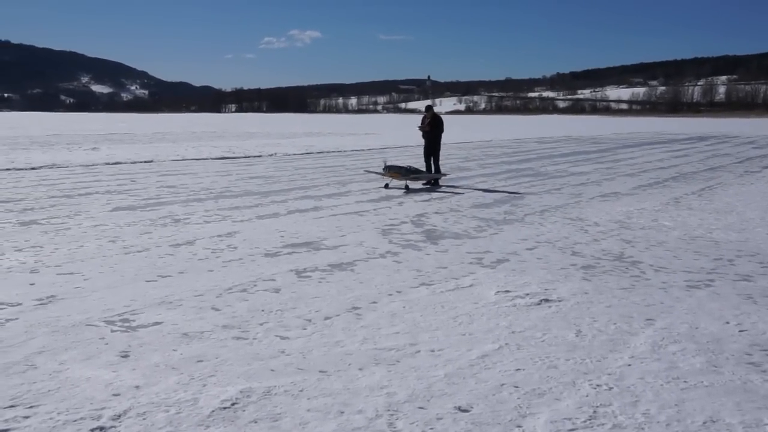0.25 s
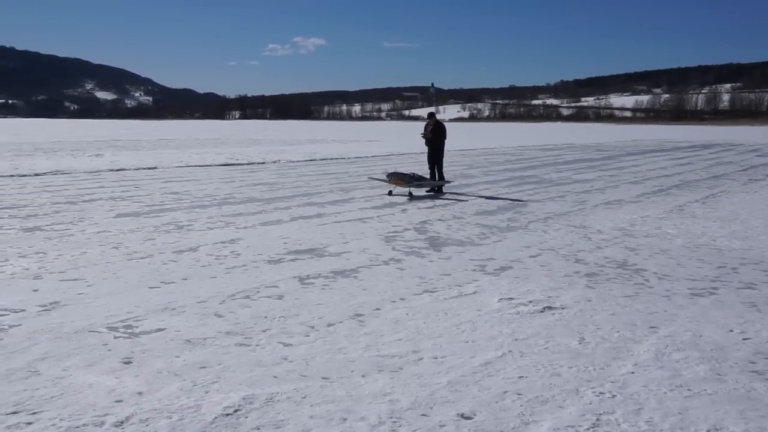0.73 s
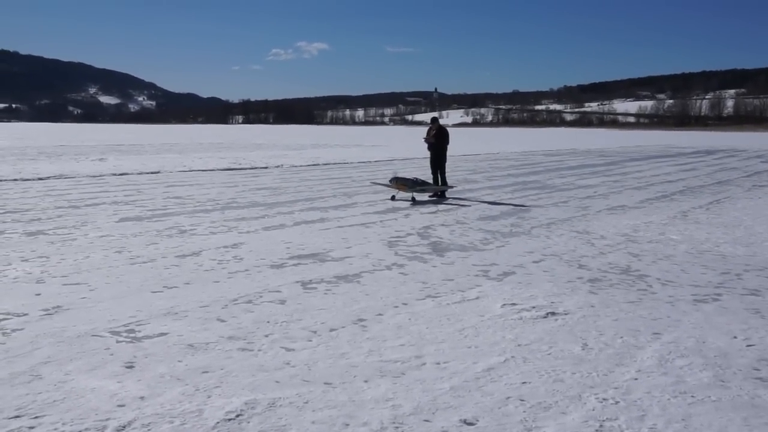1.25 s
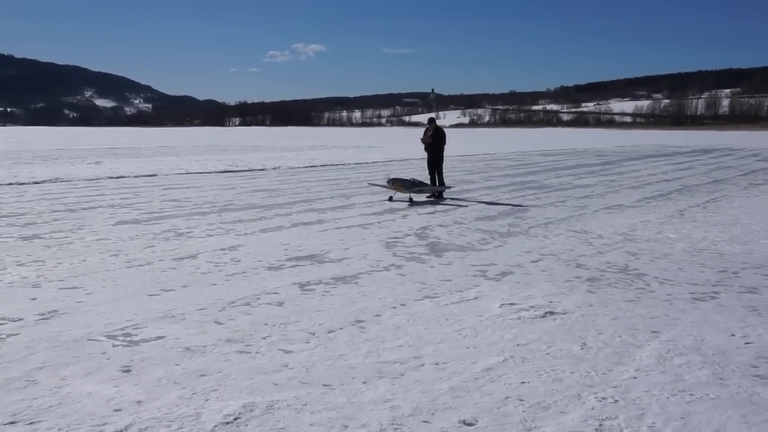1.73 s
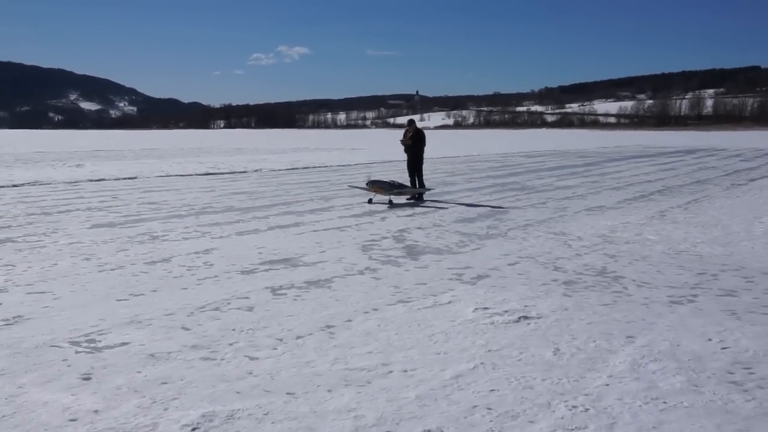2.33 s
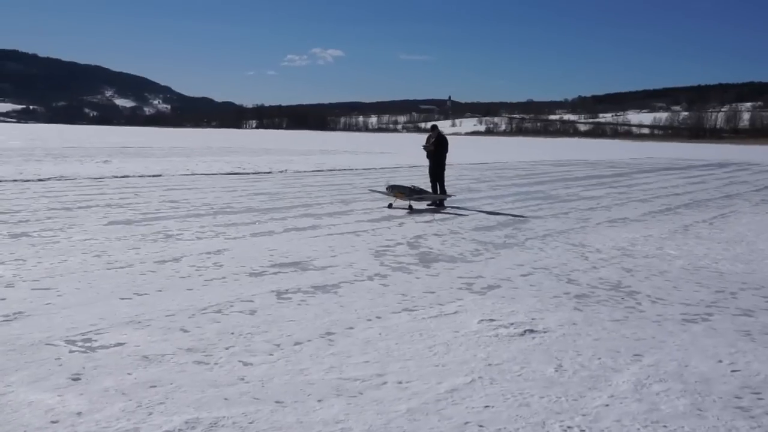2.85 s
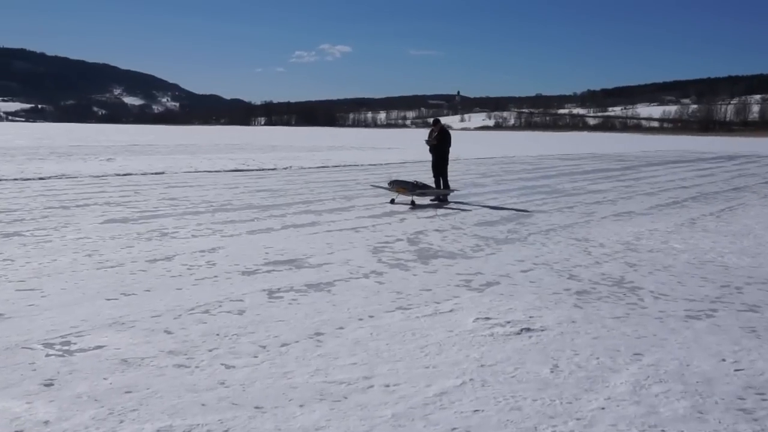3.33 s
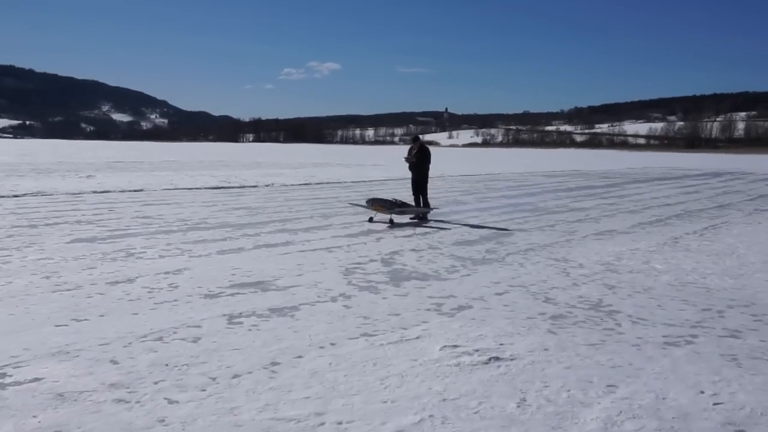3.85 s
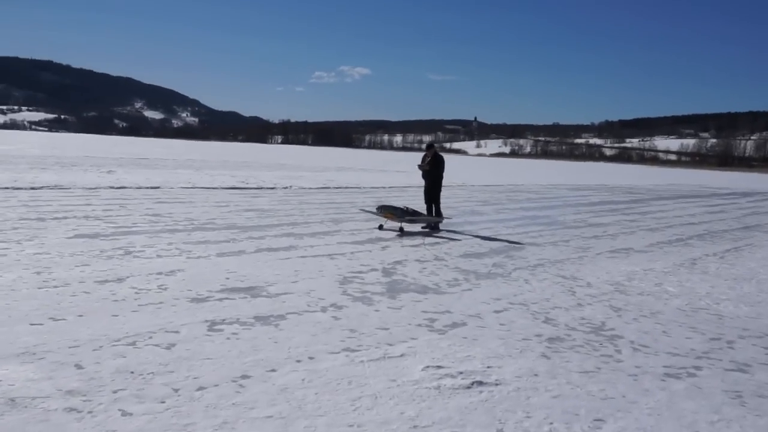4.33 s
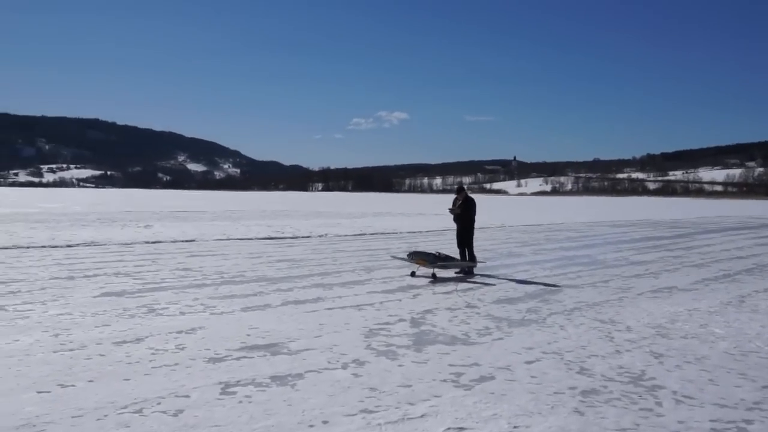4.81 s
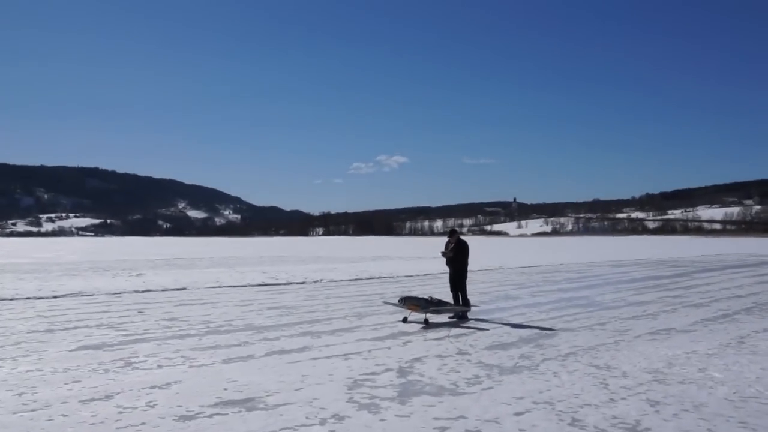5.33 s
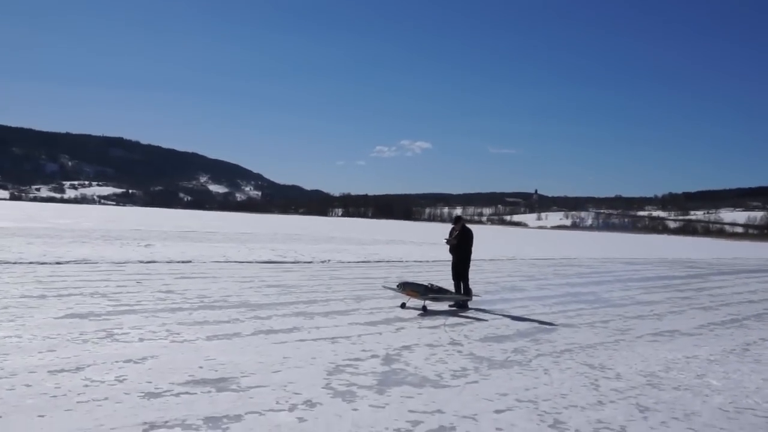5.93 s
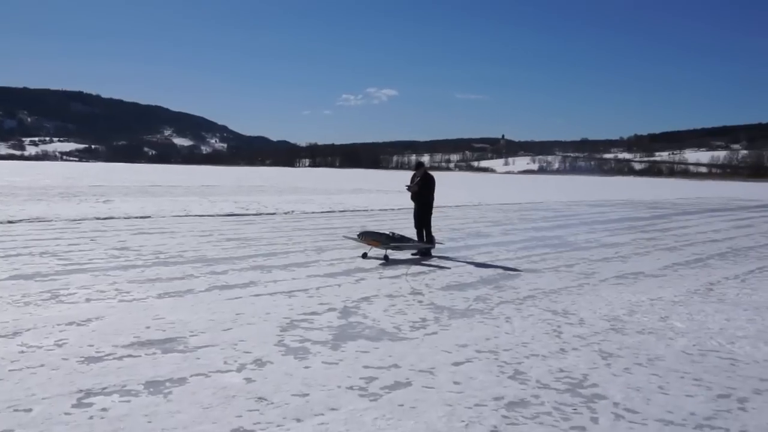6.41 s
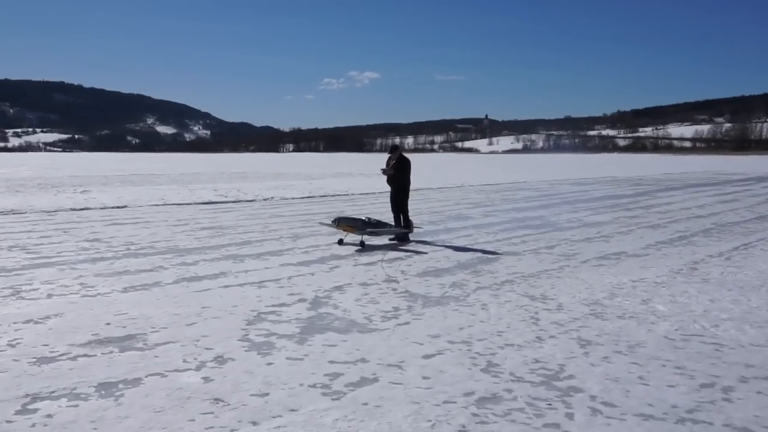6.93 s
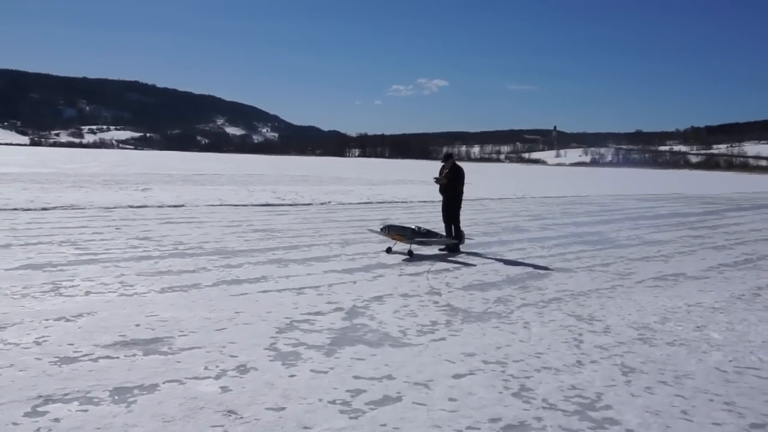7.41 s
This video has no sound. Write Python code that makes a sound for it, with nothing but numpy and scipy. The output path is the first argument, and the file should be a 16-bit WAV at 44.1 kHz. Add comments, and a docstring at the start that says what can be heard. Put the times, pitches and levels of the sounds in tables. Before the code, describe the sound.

A large model aircraft's petrol engine climbs from a lumpy, popping idle to a hard full-throttle drone, holds, then starts dropping at the very end.

```python
"""A four-stroke single with a three-blade propeller revs up on a model aircraft held on a frozen lake,
holds full throttle and is cut. Its exhaust note is a sum of multiples of the firing rate; the valve crack
and blade tip snaps are clicks through resonances; prop wash and roar are noise pulsing with the engine.
All of it reaches a hand-held camera directly and off the ice. Behind it the camera's small motor buzzes,
its body takes a few soft bumps and a light wind brushes its ports."""
import sys
import numpy as np
from scipy import signal
from scipy.fft import rfft, irfft
from scipy.io import wavfile
from scipy.ndimage import uniform_filter1d, map_coordinates

SR = 44100
rng = np.random.default_rng(int(sys.argv[2]) if len(sys.argv) > 2 else 0)


def to_wav(s):
    """Save 16-bit WAV."""
    ch = np.atleast_2d(s).T  # columns
    pcm = np.round(np.clip(ch, -1, 1) * 32767)  # PCM
    wavfile.write(sys.argv[1], SR, pcm.astype(np.int16))


N = 338026

# throttle curve before the shutdown: (t/s, firing rate f/Hz)
ENGINE_SPEED = [(0, 21.3), (.15, 22.65), (.3, 23.46), (.48, 23.3), (.6, 26.7), (.92, 33.62), (1.09, 35.91),
                (1.26, 37.19), (1.45, 38.05), (1.92, 39.04), (2.2, 41.64), (2.41, 43.1), (3.07, 47.61),
                (3.39, 50.24), (4.03, 54.54), (4.24, 55.29), (4.8, 56.49), (5.18, 56.85), (5.67, 57.88),
                (6.2, 58.08), (7.0, 58.1), (7.4, 58.25)]
SHUT_S, SLOWING_HZ_PER_S2, FULL_RATE_HZ = 7.415, 146, 58


def speed():
    """Firings per second; once the throttle shuts the speed falls ever faster."""
    since_shut = np.maximum(np.arange(N) / SR - SHUT_S, 0)
    return in_time(ENGINE_SPEED)[0] - SLOWING_HZ_PER_S2 * since_shut ** 2


def at_speed(law):
    """Level in dB that grows with engine speed, from (level/dB at full rate, dB per dB of speed)."""
    full_db, slope = law
    return full_db + slope * 20 * np.log10(speed() / FULL_RATE_HZ)


# what reaches the camera: (t/s, level change/dB, upper part of the exhaust note level/dB,
# treble level change/dB)
REACH = [(0, 1, -6, 4.5), (.5, 0, -11, 6.5), (.8, 1.5, -10.5, 2), (1.2, -0.5, -4, -3), (1.9, -1, -3.5, 3),
         (2.4, 0.5, -3.5, 1), (2.8, 1, -4, 3.5), (3.3, 2.5, -2.5, 3.5), (4.05, 3.5, -2.5, 2),
         (4.25, 0.5, -4, 1.6), (4.72, -2.5, 3.5, 3), (4.85, 0.5, 4, 1.5), (5.15, -1, 2.5, -1),
         (5.4, 3, 6, -0.5), (5.9, 3.5, 5.5, -1), (6.5, 3, 6.5, 1.5), (7.0, 3, 4, 2), (7.4, 4.5, 4, 0.5),
         (7.67, 7, -3.5, 5)]
# the upper part sets in between these: (f/Hz)
UPPER_HZ = [664, 746]
# colour of the exhaust pipe, through which the multiples glide: (f/Hz, level/dB)
PIPE_COLOUR = [(40, -39), (105, -10), (118, -11), (160, -6.5), (200, 2.5), (265, 8), (300, 0.5), (345, 1.5),
               (410, -2), (480, 0.5), (530, -7), (590, -9.5), (650, -12.5), (740, -10.5), (820, -12),
               (900, -16), (970, -6.5), (1040, 1.5), (1110, 0), (1200, -1.5), (1300, -0.5), (1400, -7.5),
               (1500, -6.5), (1620, -11), (1800, -84), (2000, -31.5)]
# shape of one firing: (multiple of the firing rate, level/dB)
FIRING_SHAPE = [(1, -15), (2, -5), (3, -4), (4, -3), (5, 8.5), (6, 10.5), (7, 7.5), (8, 9.5), (9, 12.5),
                (10, 10.5), (11, 5.5), (12, 3), (13, 12), (14, 11.5), (15, 12), (16, 8), (17, 5), (18, 7),
                (19, 1), (20, 3), (21, -10), (22, 4), (23, 5.5), (24, 3.5), (25, 3), (26, -9), (27, -7.5),
                (28, 6.5), (29, -2.5), (30, 4)]
# change of that shape: (multiple, level/dB at idle, level/dB at low throttle, level/dB at part throttle)
PART_LOAD = [(3.04, 3, -2.5, -2.5), (4, 5, 12.5, 6.5), (5.01, -8, 0, -2.5), (6, -9, -9, -11.5),
             (7.02, 5, 4, 4), (8, 3, 3.5, 1), (8.94, -5, -4, -3), (10.03, -6, -5.5, -7), (11.2, 3, 2.5, -3),
             (12, 4, 13, 13.5), (13, -6, -7.5, 0), (14, 3, 3.5, 3), (14.95, 0, -5.5, -5),
             (16.2, 4, -3, -5.5), (17.13, 3, 6, 8.5), (18, 2, 6, 6.5), (19, 6, 11.5, 4), (20, -2, 6, 7),
             (20.8, 9, 13, 16), (22, 7, 0, 3.5), (23.8, 0, -7, -1), (26.1, 2, -3, 6), (27, 3, -1, -3),
             (28, -1, -13, -1), (29, 3, -5, 5), (30, -10, -5, -2)]
# idle ends over 1-2, low gives way to part over 3-4, part to full over 5-6: (firing rate f/Hz)
PART_LOAD_RATES = [24, 28, 39, 42, 47, 54]
# the firing weakens as the throttle shuts: (t/s, level/dB)
POPS_FADE = [(7.38, -1), (7.5, -2)]
# blade passes in the note, before their rise: (multiple, level/dB)
BLADE_NOTE = [(6, 13), (12, 15.5), (18, 15.5), (24, 12.5), (30, 1.5)]
# the blade passes come forward: (t/s, level/dB)
BLADES_RISE = [(4.0, -27), (7.03, -16), (7.12, -9), (7.4, -2.5)]


def note_db(at):
    """Level of each multiple at the given samples: firing shape through the pipe, plus blade passes."""
    rate, order = speed()[at, None], np.arange(1, 43)
    log_hz = np.log(rate * order)
    pipe_hz, pipe_db = np.transpose(PIPE_COLOUR)
    pops = np.interp(log_hz, np.log(pipe_hz), pipe_db)
    pops = pops + np.interp(log_hz, np.log(UPPER_HZ), [0, 1]) * in_time(REACH)[1][at, None]
    pops = pops + np.interp(order, *np.transpose(FIRING_SHAPE))
    multiple, *changes = np.transpose(PART_LOAD)
    shares = ([1, 0, 0, 0, 0, 0], [0, 1, 1, 0, 0, 0], [0, 0, 0, 1, 1, 0])   # idle, low, part
    for change, share in zip(changes, shares):
        shape_change = np.interp(order, multiple, change, left=0, right=0)
        pops = pops + np.interp(rate, PART_LOAD_RATES, share) * shape_change
    power = amp(pops + in_time(POPS_FADE)[0][at, None]) ** 2
    for k, db in BLADE_NOTE:
        power[:, round(k) - 1] += amp(db + in_time(BLADES_RISE)[0][at]) ** 2
    return 10 * np.log10(power)


# the later pops fade with speed: (firing rate f/Hz, strength 0-1)
LATER_POPS = [(22, .7), (36, .65), (47, .5), (54, 0)]
# they are dull and die out between these: (f/Hz)
LATER_POPS_HZ = [550, 900]
# weaker pops follow each firing: (delay as share of the cycle, share of their strength)
AFTER_POPS = [(.2, .55), (.39, 1)]


def later_pops(at, count):
    """Complex gain that delayed, duller copies of each pop put on every multiple."""
    rate, order = speed()[at, None], np.arange(1, count + 1)
    share = np.interp(rate, *np.transpose(LATER_POPS)) * np.interp(rate * order, LATER_POPS_HZ, [1, 0])
    return 1 + share * sum(part * np.exp(-2j * np.pi * turn * order) for turn, part in AFTER_POPS)


# exhaust level law: (level/dB at full rate, dB per dB of speed)
TONE_LAW = (-25.5, 2.74)
# pops ring into the next between these, so the low multiples shift more: (firing rate f/Hz)
SCATTER_RATES = [30, 52]
SCATTER_RAD, SCATTER_HZ, SCATTER_TOP_ORDER = 1.3, .25, 13   # echoes in the pipe slowly shift these
# slow pops come early: (firing rate f/Hz, share of the cycle)
IDLE_LEAD = [(24, .07), (34, 0)]
# the extra waver of the upper multiples ends between these: (firing rate f/Hz)
UNEVEN_RATES = [44, 53]
UNEVEN_DB, UNEVEN_FROM_ORDER = 1.8, 9
WAVER_DB, WAVER_HZ, SLIP_RAD = 1.0, 7.0, .12   # no two pops alike
RING_SHARE = .35   # share of the minimum phase of each note
BASS_LAG_RAD, IDLE_LAG_SHARE = 6.9, .45   # slow pops leave the pipe more at once
SWELL_SLIP_RAD = 1.1   # extra slip in the swell blurs the pops, not the blade passes


def exhaust_note(turns):
    """Multiples of the firing rate, phased so that each pop starts hard and rings on."""
    now, out = np.arange(N), np.zeros(N)
    at = now[::1024]
    rate, db = speed()[at], note_db(at)
    count = db.shape[1]
    mirrored = np.c_[db[:, :1], db, db[:, -1:], db[:, ::-1]]
    log_gain = RING_SHARE * np.log(amp(mirrored))
    phase = -np.imag(signal.hilbert(log_gain, axis=1))[:, 1:count + 1] - np.pi / 2
    multiple = np.arange(1, count + 1)
    overlap = np.interp(rate, SCATTER_RATES, [0, 1])
    # low multiples leave the pipe later
    lag = BASS_LAG_RAD * (IDLE_LAG_SHARE + (1 - IDLE_LAG_SHARE) * overlap[:, None])
    phase = phase - lag * (np.log(multiple / 20) - multiple / 20 + 1)
    phase = phase + 2 * np.pi * multiple * np.interp(rate, *np.transpose(IDLE_LEAD))[:, None]
    later = later_pops(at, count)
    phase, db = phase + np.angle(later), db + 20 * np.log10(np.abs(later))
    blur = SWELL_SLIP_RAD * swell()[at]
    uneven = np.interp(rate, UNEVEN_RATES, [UNEVEN_DB, 0])
    for k in range(count):
        wander = SCATTER_RAD * drift(SCATTER_HZ)[at] * (k < SCATTER_TOP_ORDER) * overlap
        waver = (WAVER_DB + uneven * (k >= UNEVEN_FROM_ORDER)) * drift(WAVER_HZ)[at]
        slip = (SLIP_RAD + blur * (k % 6 != 5)) * drift(WAVER_HZ)[at]
        level = np.interp(now, at, amp(db[:, k] + waver))
        shift = np.interp(now, at, phase[:, k] + slip + wander)
        out += level * np.cos(2 * np.pi * (k + 1) * turns + shift)
    return amp(at_speed(TONE_LAW) + in_time(REACH)[0]) * evened(out)


# crack level law: (level/dB at full rate, dB per dB of speed)
CRACK_LAW = (-23, 5.6)
# valve crack resonances: (f/Hz, width/Hz, level/dB)
CRACK_MODES = [(1204, 450, 3), (4640, 680, 12), (5320, 400, 3), (8800, 1500, -4), (4310, 340, 4),
               (2900, 1200, -12)]
# the crack turns away: (t/s, level/dB)
CRACK_FADE = [(5.4, -7), (5.5, -17), (7.0, -21)]
# change of each resonance at low speed: (level/dB)
CRACK_SLOW_DB = [7, -11, 5, -2, 11, 4]
# that change goes between these: (firing rate f/Hz)
CRACK_SLOW_RATES = [38, 45]
CRACK_LEAD = .04   # crack and flare of air precede the pop by this share of a cycle


def valve_crack(turns):
    """Each firing strikes every steep resonance with its own strength; a puff of gas escapes with it."""
    out, slow = 0, np.interp(speed(), CRACK_SLOW_RATES, [1, 0])
    for k, (hz, width, db) in enumerate(CRACK_MODES):
        slow_db = slow * (CRACK_SLOW_DB[k] + 2.5 * drift(15.0))
        pops = clicks(turns + CRACK_LEAD, spread_db=1.2) * amp(slow_db)
        puff = decay(pops, 0.00088) * rng.standard_normal(N)
        struck = resonate(pops + 0.012 * puff, [(hz, width, db)])
        out = out + (-1) ** k * resonate(struck, [(hz, width, 0)])   # twice through: steeper
    level_db = at_speed(CRACK_LAW) + in_time(REACH)[2] + in_time(CRACK_FADE)[0]
    return amp(level_db) * evened(out)


# tip snap level law: (level/dB at full rate, dB per dB of speed)
SNAP_LAW = (-33.3, 11)
# tip snap resonances: (f/Hz, width/Hz, level/dB)
SNAP_MODES = [(3490, 240, 5.5), (3900, 200, 5.5), (5600, 1200, -6), (6900, 2100, -9)]
SNAP_WAVER_DB, SWELL_SNAP_DB = 2.5, 11   # snaps come and go, and lift in the swell
SNAP_AWAY_DB = -8   # they are partly hidden until the wash turns


def tip_snaps(passes):
    """Blade passes click through resonances; tip vortices make them a little early or late."""
    hits = clicks(passes + 0.006 * drift(130.0), spread_db=1.5)
    level_db = np.maximum.accumulate(at_speed(SNAP_LAW))   # holds its peak when the engine slows
    level_db = level_db + SNAP_WAVER_DB * drift(9.0) * (1 - swell() / 2)
    level_db = level_db + SWELL_SNAP_DB * swell() + SNAP_AWAY_DB * (1 - wash_turn())
    return amp(level_db) * evened(resonate(hits, SNAP_MODES))


SWELL_S, SWELL_ATTACK_S, SWELL_HOLD_S, SWELL_RELEASE_S = 7.04, .04, .29, .14


def swell():
    """0 to 1 and back: the treble swell around the throttle shutting."""
    corners = SWELL_S + np.cumsum([0, SWELL_ATTACK_S, SWELL_HOLD_S, SWELL_RELEASE_S])
    return np.interp(np.arange(N) / SR, corners, [0, 1, 1, 0])


# as the camera turns, the wash changes colour between these: (t/s)
WASH_TURNS_S = [5.21, 5.63]


def wash_turn():
    """0 before the camera turns, 1 after."""
    return np.interp(np.arange(N) / SR, WASH_TURNS_S, [0, 1])


# wash level law: (level/dB at full rate, dB per dB of speed)
WASH_LAW = (-28.5, 5.62)
# wash colour before the camera turns: (f/Hz, relative level/dB per Hz)
WASH_BEFORE_TURN = [(1060, -33), (1800, -0.5), (2530, 1), (3180, -2.5), (4050, 1.5), (4890, 2.5), (6020, -5),
                    (6830, -3.5), (9030, -2.5), (12300, -20.5), (13400, -28), (15500, -46)]
# wash colour after the camera turns: (f/Hz, relative level/dB per Hz)
WASH_AFTER_TURN = [(1060, -21), (1800, -16), (2230, -9.5), (2650, 2), (2850, -10), (3090, 5.5), (3730, 0.5),
                   (4050, 2.5), (4300, -11.5), (4570, 7), (4800, -8.5), (5050, -20), (5300, -3), (6100, -2),
                   (6900, -2.5), (8320, 1.5), (9530, -9.5), (12200, -11), (13500, -25), (15500, -91)]
SWELL_WASH_DB = 1.5


def prop_wash(turns, passes):
    """Stirred air: treble noise flaring with every firing and every blade pass."""
    full = wash_turn()
    hiss = np.sqrt(1 - full) * noise(WASH_BEFORE_TURN) + np.sqrt(full) * noise(WASH_AFTER_TURN)
    level_db = at_speed(WASH_LAW) + in_time(REACH)[2] + SWELL_WASH_DB * swell() + 0.95 * drift(15.0)
    flares = gate(turns + CRACK_LEAD, depth=0.55, fall=4.5) * gate(passes, depth=0.35, fall=6.0)
    return amp(level_db) * hiss * flares


# roar level law: (level/dB at full rate, dB per dB of speed)
ROAR_LAW = (-38, 3.0)
# roar colour: (f/Hz, relative level/dB per Hz)
ROAR_COLOUR = [(35, -66), (60, -35), (167, -15.5), (277, -6.5), (459, -4.5), (629, -10.5), (1010, -9),
               (1260, -6.5), (1810, -12), (2600, -59), (3380, -48), (5720, -120)]


def roar(turns):
    """Broad low and middle noise that pulses slightly with each firing."""
    level_db = at_speed(ROAR_LAW) + in_time(REACH)[0] + 1.0 * drift(14.0)
    return amp(level_db) * gate(turns, depth=0.059, fall=0.76) * noise(ROAR_COLOUR)


def aircraft():
    """Exhaust, valve, propeller and the air they stir, all locked to one engine phase."""
    turns = .13 + np.cumsum(speed()) / SR
    passes = 6 * turns + .3   # three blades, two revolutions a firing
    struck = exhaust_note(turns) + valve_crack(turns) + tip_snaps(passes)
    return struck + roar(turns) + prop_wash(turns, passes)


# echo off the ice as the camera sways: (t/s, first notch f/Hz, strength left 0-1, strength right 0-1)
ICE_ECHO = [(0, 2050, .4, .15), (2.0, 2050, .6, .2), (2.75, 2080, .65, .3), (3.0, 1960, .65, .5),
            (3.3, 1900, .65, .5), (3.42, 1920, .65, .5), (3.52, 2080, .65, .55), (4.1, 2070, .65, .5),
            (4.25, 1970, .6, .45), (4.45, 1950, .55, .4), (4.7, 1950, .3, .2), (4.78, 1950, 0, 0)]
# a later echo, stronger on the right at first, sweeps upward as the camera dips:
# (t/s, first notch f/Hz, strength left 0-1, strength right 0-1)
ICE_SWEEP = [(0, 1650, .45, .6), (1.9, 1650, .5, .65), (2.5, 1650, .2, .6), (3.0, 1640, .15, .35),
             (4.1, 1640, .15, .35), (4.35, 1540, .4, .45), (4.6, 1480, .45, .5), (4.74, 1410, .7, .7),
             (4.8, 1490, .75, .75), (4.88, 1670, .8, .8), (4.95, 1800, .85, .85), (5.1, 2000, .85, .85),
             (5.35, 2110, .55, .55), (5.43, 2300, .3, .3), (5.55, 3050, .3, .3)]
# the echoes lack deep bass, and snow on the ice swallows their top: (f/Hz)
ECHO_BAND_HZ = [200, 8500]
RIGHT_NOTCH = .975   # the right port hears the echo a little later
FIRST_ECHO = .18   # share of the strength; an inverted echo twice as late has all of it


def over_ice(x):
    """Direct sound plus short echoes whose lag follows the camera's height."""
    out, now = x.copy(), np.arange(N)
    dull = signal.sosfiltfilt(signal.butter(1, ECHO_BAND_HZ, "band", fs=SR, output="sos"), x)
    echoes = ((ICE_ECHO, 1, FIRST_ECHO), (ICE_ECHO, 2, -1), (ICE_SWEEP, 2, -1))
    for c, scale in enumerate((1, RIGHT_NOTCH)):
        smooth = signal.cspline1d(dull[c])
        for table, half_cycles, share in echoes:
            notch_hz, *strength = in_time(table)
            lag = half_cycles * SR / (2 * notch_hz * scale)   # samples
            late = map_coordinates(smooth, [now - lag], order=3, prefilter=False)
            out[c] += share * strength[c] * late
    return out


# port balance: (f/Hz, left over right level/dB)
PORT_BALANCE = [(60, -3), (110, 0), (200, -.5), (380, 1), (700, 0), (1290, 1.5), (2380, 2), (4400, -1),
                (8120, 5), (11000, -1), (15000, 0)]
# port phase: (f/Hz, radians by which left leads)
PORT_LEAD = [(0, 0.3), (1500, 0.37), (2600, -1.13), (3900, 0.99), (4800, 0.74), (6200, -0.72),
             (8500, -0.82), (15000, -0.81)]
# middle band swing, before 3 dB is taken off: (t/s, left over right level/dB)
CAMERA_SWING = [(0, -7), (.5, -2), (1, 5), (2.4, 3.5), (4.1, 4.5), (4.85, 1.5), (5.4, 4.5), (7.67, 6)]


def ports(x):
    """Two ports colour and delay the sound differently; the middle band swings as the camera turns."""
    tilt = amp(at_bins(PORT_BALANCE, size=2 * N) / 2) * np.exp(.5j * at_bins(PORT_LEAD, size=2 * N))
    x = irfft(rfft(x, 2 * N) * [tilt, 1 / tilt], 2 * N)[:, :N]
    middle = signal.sosfiltfilt(signal.butter(1, [550, 1600], "band", fs=SR, output="sos"), x)
    swing = amp((in_time(CAMERA_SWING)[0] - 3.0) / 2)
    return x + middle * (np.array([swing, 1 / swing]) - 1)


# motor buzz, before the 3 dB left-right offsets: (t/s, level/dB)
MOTOR_LEVEL = [(0, -58), (.25, -61.5), (.42, -55.5), (1, -56.5), (2, -51), (7.67, -54)]
# body resonances, passed twice: (f/Hz, width/Hz, level/dB per pass)
MOTOR_RING = [(7270, 1030, 28), (5150, 190, 23)]
# the steps also hum in the shell, passed twice: (f/Hz, width/Hz, level/dB per pass)
MOTOR_HUM = [(677, 190, -3), (1160, 150, -2)]
STEPS_HZ, HUM_DB = 100.5, -59   # hum before its 5 dB left-right offsets


def camera_motor():
    """Slightly uneven motor steps, each with a grain of noise, ring in the body and hum in the shell."""
    steps = clicks(.45 + np.cumsum(STEPS_HZ * (1 + 0.0021 * drift(0.91))) / SR, spread_db=1.0)
    burst = decay(steps, 0.009) * rng.standard_normal(N)
    buzz = rms_one(resonate(resonate(steps + 0.034 * burst, MOTOR_RING), MOTOR_RING))
    hum = rms_one(resonate(resonate(steps, MOTOR_HUM), MOTOR_HUM))
    return amp(in_time(MOTOR_LEVEL)[0]) * buzz * amp([[3], [-3]]) + amp(HUM_DB) * hum * amp([[-5], [5]])


# soft bumps on the camera body: (t/s, 8 ms before the peak, peak level/dB)
BODY_BUMPS = [(0.559, -68), (1.849, -51), (2.539, -51), (2.939, -45)]


def body_bumps():
    """Each bump is one smooth pressure pulse with a dip on either side."""
    bumps, t = np.zeros(N), np.arange(N) / SR
    for s, db in BODY_BUMPS:
        u = (t - s - .008) / 0.0031
        bumps += amp(db) * (1 - u * u) * np.exp(-u * u / 2)
    return bumps


# light wind on the ports: (f/Hz, relative level/dB per Hz)
WIND_COLOUR = [(12, -20), (25, -8), (60, -5), (110, -19), (170, -1), (290, -60)]
# the wind picks up: (t/s, level change/dB)
WIND_GUST = [(0, -7), (1.3, -6), (2.9, -3), (3.3, 8), (4.9, 4), (5.5, 0), (7.67, 0)]


def wind():
    """Low noise from turbulence at the ports, rising and falling at random."""
    return amp(-70.5 + in_time(WIND_GUST)[0] + 3.0 * drift(4.0)) * noise(WIND_COLOUR)


# left-right likeness of the noises: (f/Hz, likeness 0-1)
LIKENESS = [(60, .7), (300, .9), (1400, .92), (3000, .8), (7000, .75), (15000, .7)]


def noise(spectrum):
    """Stereo noise of rms 1 whose sides share a part that varies with frequency."""
    mid, side = rfft(rng.standard_normal((2, N)))
    alike = np.clip(at_bins(LIKENESS), 0, 1)
    pair = np.sqrt(1 + alike) * mid + np.sqrt(1 - alike) * side * [[1], [-1]]
    return rms_one(irfft(pair * amp(at_bins(spectrum)), N))


def gate(turns, depth, fall):
    """Turbulence flares at each turn and dies until the next."""
    return rms_one(1 - depth + depth * np.exp(-fall * (turns % 1)))


def clicks(turns, spread_db):
    """One click per turn, split between two samples to keep its exact time, each of its own strength."""
    count = np.arange(np.ceil(turns[0]), turns[-1])
    at = np.interp(count, turns, np.arange(N))
    size, left = amp(spread_db * rng.standard_normal(len(at))), at.astype(int)
    out = np.zeros(N + 1)
    out[left] += size * (1 - at + left)
    out[left + 1] += size * (at - left)
    return out[:N] + 1e-18


def decay(x, seconds):
    """Every click dies away exponentially with this time constant."""
    return signal.lfilter([1], [1, -np.exp(-1 / (seconds * SR))], x)


def resonate(x, modes):
    """Parallel resonances with alternating signs."""
    out = 0
    for k, (hz, width, db) in enumerate(modes):
        r = np.exp(-np.pi * width / SR)
        poles = [1, -2 * r * np.cos(2 * np.pi * hz / SR), r * r]
        out = out + (-1) ** k * amp(db) * signal.lfilter([1 - r * r, 0, r * r - 1], poles, x)
    return out


def drift(rate_hz):
    """Smoothed random wander of rms 1, computed every 32 samples."""
    r = np.exp(-64 * np.pi * rate_hz / SR)
    slow = signal.lfilter([1], [1, -2 * r, r * r], rng.standard_normal(N // 32 + 2002))[2000:]
    return np.interp(np.arange(N) / 32, np.arange(len(slow)), rms_one(slow))


def evened(x):
    """Level held at rms 1 over a quarter second."""
    return x / np.sqrt(uniform_filter1d(x ** 2, size=SR // 4) + 1e-20)


def rms_one(x):
    """Scale to rms 1."""
    return x / np.sqrt(np.mean(x ** 2) + 1e-20)


def amp(db):
    """dB to gain."""
    return 10 ** (np.asarray(db) / 20)


def in_time(rows):
    """Columns of a curve table at every sample."""
    s, *columns = np.transpose(rows)
    return [np.interp(np.arange(N) / SR, s, c) for c in columns]


def at_bins(points, size=N):
    """A spectrum table at every FFT bin, interpolated over log frequency."""
    hz, value = np.transpose(points)
    return np.interp(np.log(np.fft.rfftfreq(size, 1 / SR) + 1), np.log(hz + 1), value)


def scene():
    """The aircraft across the ice with its bass thinned, and the camera in the hand."""
    low_cut = signal.butter(3, 85, "high", fs=SR, output="sos")
    heard = ports(signal.sosfilt(low_cut, over_ice(aircraft())))
    return heard + camera_motor() + body_bumps() + wind()


def record(dry):
    """A steep low-pass removes the top above 15.6 kHz."""
    return signal.sosfilt(signal.cheby2(12, 70, 15600, fs=SR, output="sos"), dry)


dry = scene()
out = record(dry)
to_wav(out)
```